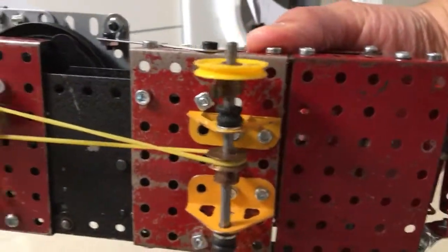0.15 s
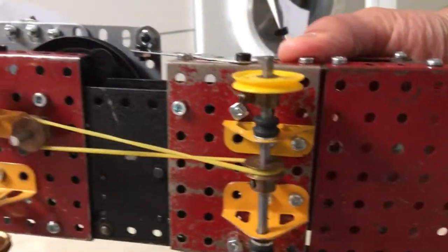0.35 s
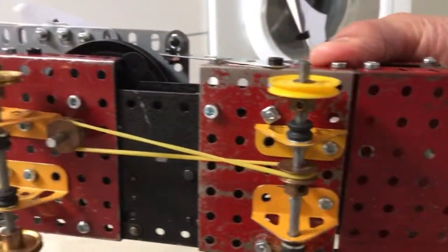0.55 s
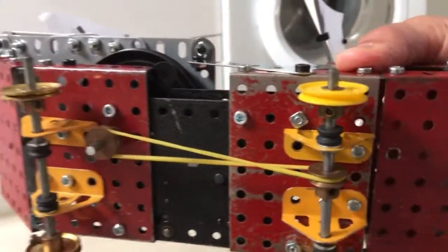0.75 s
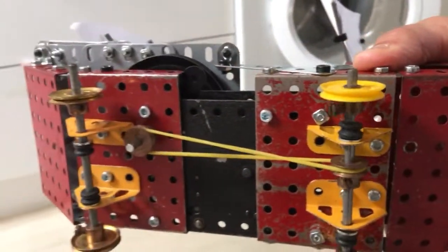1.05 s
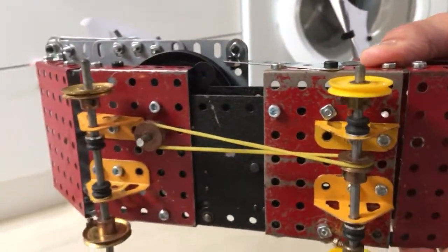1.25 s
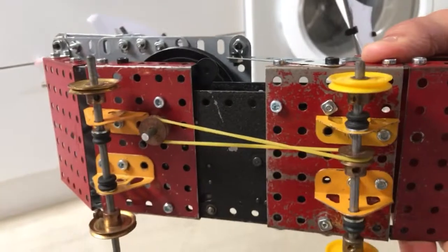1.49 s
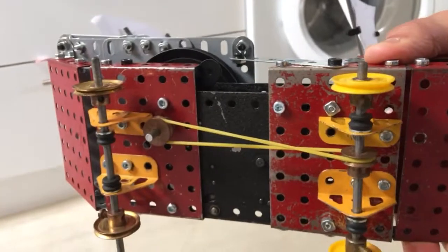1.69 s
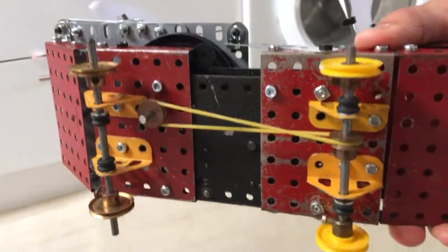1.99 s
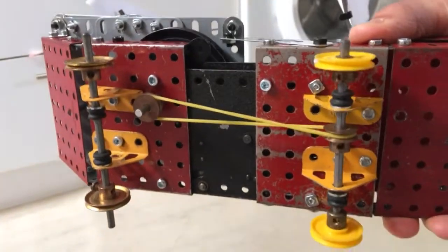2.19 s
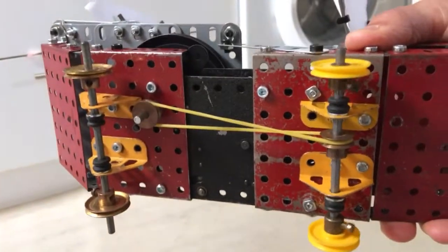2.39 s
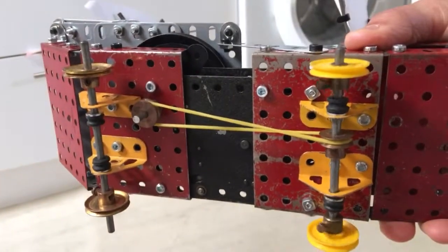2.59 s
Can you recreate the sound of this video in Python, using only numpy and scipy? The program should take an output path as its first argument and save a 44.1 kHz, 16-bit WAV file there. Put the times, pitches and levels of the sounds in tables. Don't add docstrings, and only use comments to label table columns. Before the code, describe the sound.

Clockwork gears whir in a dense metallic rattle, with thin squeals recurring at each slow pulley turn.

```python
import sys
import numpy as np
from scipy import signal
from scipy.fft import rfft, irfft
from scipy.io import wavfile
from scipy.ndimage import uniform_filter1d

SR = 44100
rng = np.random.default_rng(int(sys.argv[2]) if len(sys.argv) > 2 else 0)


def waveform_to_disk(signal):
    frames = np.transpose(np.atleast_2d(signal))
    scaled = np.clip(frames, -1, 1) * 32767
    samples = np.round(scaled).astype(np.int16)
    wavfile.write(sys.argv[1], SR, samples)


def gain_from_db(level_db):
    decades = np.asarray(level_db, float) / 20
    return 10 ** decades


N = 120834


def level(x, db):
    return x * gain_from_db(db) / np.sqrt(np.mean(x ** 2) + 1e-18)


def colour(x, points):
    hz, db = np.array(points, float).T
    size = 8192
    bins_hz = np.arange(size // 2 + 1) * SR / size
    gain_db = np.interp(np.log(bins_hz + 1), np.log(hz), db)
    cepstrum = irfft(np.log(gain_from_db(gain_db)))
    cepstrum[1:size // 2] *= 2
    cepstrum[size // 2 + 1:] = 0
    impulse = irfft(np.exp(rfft(cepstrum)))[:size // 2]
    return signal.fftconvolve(x, impulse)[:N]


def ring(x, hz, width_hz):
    b, a = signal.iirpeak(min(hz, .45 * SR), hz / width_hz, SR)
    return signal.lfilter(b, a, x)


def walk(rate_hz):
    hold = max(int(SR / rate_hz), 2)
    steps = np.repeat(rng.standard_normal(N // hold + 1), hold)
    return 1.3 * uniform_filter1d(uniform_filter1d(steps, hold), hold)[:N]


def patter(ticks_per_s, spread_db):
    chance, sign, size = rng.random((3, N))
    hit = chance < ticks_per_s / SR
    size_db = spread_db * np.minimum(-np.log(1 - size), 5)
    return level(hit * np.sign(sign - .5) * gain_from_db(size_db), 0)


# time_s, level_db
DRIVE = [(0, -34), (.35, -34), (.6, -33), (.85, -36.5), (1.0, -34), (1.2, -35.5), (1.45, -34),
         (1.75, -36.5), (2.0, -33.5), (2.3, -34.5), (2.55, -35), (2.74, -34.5)]
# freq_hz, gain_db (per Hz)
FRAME = [(300, -29.5), (1070, -16.5), (1800, -7), (3800, -3.5), (6000, -5.5), (8500, -4.5), (13000, -11),
         (15700, -18)]
# freq_hz, width_hz, level_db
PLATES = [(963, 21, -41.5), (1803, 32, -24), (1983, 30, -22), (2718, 81, -15), (3880, 360, -8),
          (4384, 45, -14.5), (5160, 190, -11), (5620, 270, -13.5), (6220, 84, -15), (6860, 83, -17)]
# freq_hz, width_hz, level_db
STIFF_PART = (12980, 70, -18)


def gears(t):
    throb = 1
    for shaft_hz, depth in [(83.5, .26), (117.5, .3)]:
        turns = np.cumsum(shaft_hz * (1 + .03 * walk(4))) / SR
        throb = throb * (1 + depth * np.cos(2 * np.pi * turns))

    def teeth():
        return patter(13000 * throb, 2.2)

    shake_db = .8 * walk(20)
    shared = teeth()
    out = level(colour(shared, FRAME), -2.34) * gain_from_db(.86 * walk(29.62))
    for hz, width_hz, db in [*PLATES, STIFF_PART]:
        plate = ring(shared + teeth(), hz, width_hz)
        out = out + level(plate, db) * gain_from_db(1.8 * walk(25))
    time_s, drive_db = np.array(DRIVE).T
    out = out * gain_from_db(np.interp(t, time_s, drive_db) + .91 + shake_db)
    return signal.sosfilt(signal.butter(2, 350, "high", fs=SR, output="sos"), out)


# start_s, length_s, pitch_hz, level_db
SQUEALS = [(.054, 0.01, 10700, -23), (.091, 0.0098, 10900, -29), (.132, 0.032, 10730, -25.5),
           (.165, 0.022, 11000, -44), (.188, 0.054, 10230, -35.5), (.206, 0.042, 11100, -29.5),
           (.228, .05, 9100, -33), (.255, 0.035, 10500, -28.5), (.3, 0.0084, 10440, -30),
           (.752, 0.02, 10800, -34), (.796, 0.015, 10600, -36), (.81, 0.031, 11100, -33),
           (.838, 0.035, 10750, -29.5), (.885, .012, 10700, -32), (.905, .03, 11100, -41),
           (.938, 0.015, 10700, -29), (.953, 0.037, 10440, -24.5), (1.016, 0.018, 10700, -27),
           (.95, .05, 12030, -49), (1.018, .025, 12030, -49),
           (1.517, 0.009, 10550, -31), (1.525, .035, 11150, -40), (1.56, .022, 10750, -29),
                (1.565, .012, 9500, -45), (1.585, 0.086, 11100, -37), (1.653, .025, 10700, -29),
                (1.676, 0.029, 10480, -24), (1.699, 0.015, 10550, -25), (1.727, 0.011, 10650, -29.5),
                (1.65, 0.076, 12030, -45), (1.733, .012, 12030, -42), (1.826, 0.0063, 11350, -29),
                (2.268, 0.021, 10800, -32.5), (2.31, .04, 11200, -48), (2.368, 0.036, 10550, -29.5),
                (2.406, 0.025, 10550, -30.5), (2.443, 0.009, 10640, -31), (2.37, .08, 12030, -43),
                (2.508, 0.013, 12030, -38), (2.535, .03, 11300, -42)]
# start_s, length_s, pitch_hz, level_db
CHIRPS = [(.163, 0.013, 5580, -30), (.182, 0.0084, 5450, -27), (.189, 0.021, 5190, -24.5),
          (.19, .014, 15480, -35), (.364, .024, 5600, -29), (.795, 0.037, 5450, -34),
          (.884, 0.011, 6030, -35), (.905, 0.017, 5650, -36), (1.62, 0.011, 5480, -34),
          (2.21, 0.054, 5480, -41), (2.264, .007, 5650, -29), (2.305, 0.033, 5720, -34.5),
          (2.336, 0.017, 5600, -29), (0.746, 0.05, 5650, -37), (1.495, 0.036, 5450, -45)]


def squeals(t):
    sag_hz, sag_s, edge_s = 150, .012, .002
    halo_db, halo_per_db, firm_db, chirp_halo_db = -15, .9, -27, 8
    halo_rate_hz = 1000
    wander_hz = 50 * (walk(120) + walk(500))
    flutter = gain_from_db(3.0 * walk(330))
    grit = walk(halo_rate_hz) + 1j * walk(halo_rate_hz)
    skirt = level(ring(patter(2500, 2.0), 9700, 3100), -11.5)
    out = np.zeros(N)
    for k, (start_s, length_s, hz, db) in enumerate([*SQUEALS, *CHIRPS]):
        i = slice(max(int((start_s - edge_s) * SR), 0), int((start_s + length_s + 4 * edge_s) * SR))
        shift = -997 * k
        age_s = t[i] - start_s
        ragged_db = halo_db + halo_per_db * (firm_db - db) + chirp_halo_db * (hz < 7000)
        rough = np.roll(flutter * (1 + gain_from_db(ragged_db) * grit), shift)[i]
        bend_hz = sag_hz * (np.exp(-age_s / sag_s) - .5) + np.roll(wander_hz, shift)[i]
        tone = np.exp(2j * np.pi * np.cumsum(hz + bend_hz * (hz / 10500) ** .5) / SR)
        catch = np.clip(age_s / edge_s + .5, 0, 1)
        release = np.clip((length_s - age_s) / (4 * edge_s) + .5, 0, 1) ** 2
        shape = catch * release
        fade_db = -1.5 * (age_s / length_s - .5)
        out[i] += gain_from_db(db - 2 + fade_db) * shape * (rough * tone).real
        out[i] += gain_from_db(db) * shape * skirt[i]
    return out


# start_s, length_s, level_db, low_share (0-1)
SCRAPES = [
    (.012, .022, -26.5, .55),
    (.366, .011, -28.5, .75),
    (.727, .022, -25.5, .2),
    (1.449, .016, -28, .35),
    (2.163, .013, -29.5, .45),
]


def scrapes(t):
    grit = patter(8500, 1.34)

    def burr(hz, width_hz):
        return level(ring(ring(grit, hz, width_hz), hz, 2 * width_hz), 0)

    low, high = burr(12030, 220), burr(12850, 800)
    half = level(ring(patter(6300, 2.61), 6145, 450), -4)
    edge_s, hold_s = .0015, 1
    out = 0
    for start_s, length_s, db, low_share in SCRAPES:
        edges_s = np.minimum(t - start_s, start_s + hold_s - t)
        gate = np.clip(edges_s / edge_s + .5, 0, 1) ** 2
        decay = np.exp(-(np.maximum(t - start_s, 0) / length_s) ** 2)
        mix = low_share ** .5 * low + (1 - low_share) ** .5 * high + half
        out = out + gain_from_db(db) * gate * decay * mix
    return out


# centre_s, length_s, level_db
RUBS = [
    (.24, 0.11, -42),
    (0.96, 0.15, -43.5),
    (1.63, 0.33, -47.5),
    (2.35, 0.26, -44.5),
    (2.68, 0.021, -42.5),
    (1.1, 0.037, -42.5),
    (.39, 0.033, -54),
]
# freq_hz, width_hz, level_db
BEARING = [(9100, 130, -5.5), (9520, 100, 0.5), (10300, 67, -8.5), (11100, 200, -2.5), (12030, 120, 0),
           (12800, 400, -4)]


def rubbing(t):
    press = sum(gain_from_db(db) * np.exp(-(2 * (t - centre_s) / length_s) ** 2) for centre_s, length_s, db in RUBS)

    def grit():
        return patter(5000, 3.0)

    out = level(ring(grit(), 9200, 5000), -5)
    for hz, width_hz, db in BEARING:
        out = out + level(ring(grit(), hz, width_hz), db) * gain_from_db(3.5 * walk(50))
    return press * out


# time_s, peak_db
TICKS = [
    (.3676, -33),
    (.807, -28),
    (0.886, -27.5),
    (0.8992, -28.5),
    (1.81, -34),
    (2.6124, -36),
    (2.6744, -24.5),
]


def ticks(t):
    hits = np.zeros(N)
    for time_s, db in TICKS:
        hits[int(time_s * SR)] = gain_from_db(db)
    tail = np.exp(-t[:600] / .0029) * rng.standard_normal(600)
    return gain_from_db(10.5) * colour(signal.fftconvolve(hits, tail)[:N], FRAME)


# time_s, freq_hz, peak_db, t60_s
KNOCKS = [
    (0.159, 527, -42.5, 0.18),
    (.88, 528.6, -52, 0.33),
    (0.938, 429, -44.5, 0.34),
    (2.07, 983, -38, 0.14),
    (2.078, 258, -63, .2),
    (2.325, 1745, -33, 0.1),
]


def knocks(t):
    out = 0
    for time_s, hz, db, t60_s in KNOCKS:
        age_s = np.maximum(t - time_s, 0)
        rise = 1 - np.exp(-age_s / .015)
        out = out + gain_from_db(db - 60 * age_s / t60_s) * rise * np.sin(2 * np.pi * hz * age_s)
    return out


# freq_hz, level_db (rms)
TONES = [(248, -71.5), (356, -71.5), (431, -72.5), (527, -66.5), (587, -68.5), (778, -66.5), (915, -66),
         (970, -68)]


def hum(t):
    out = gain_from_db(-59 + 3 + .49 * walk(9)) * np.sin(2 * np.pi * 49.4 * t)
    for hz, db in TONES:
        out = out + level(ring(rng.standard_normal(N), hz, 9), db)
    beat_top_s, beat_period_s = .54, .8
    beat = np.abs(np.cos(np.pi * (t - beat_top_s) / beat_period_s)) ** .75
    turns = np.cumsum(167.5 + 1.65 * walk(4.79)) / SR
    return out + gain_from_db(-64 + 3.5) * beat * np.sin(2 * np.pi * turns)


# centre_s, length_s, level_db
THUMPS = [
    (.165, .03, -58),
    (2.11, 0.064, -52.5),
]


def thumps(t):
    thud_colour = [(30, -27), (70, 8), (300, -3), (1000, -9), (2000, -29)]  # Hz, dB per Hz
    thud = level(colour(rng.standard_normal(N), thud_colour), 0)
    return thud * sum(gain_from_db(db) * np.exp(-((t - centre_s) / length_s) ** 2) for centre_s, length_s, db in THUMPS)


# freq_hz, gain_db (per Hz)
ROOM = [(28, -38), (45, -10), (80, -2), (120, -12.5), (300, -12.5), (800, -24), (1600, -42)]


def room():
    return level(colour(rng.standard_normal(N), ROOM), -63.5)


def scene():
    t = np.arange(N) / SR
    axle = squeals(t) + scrapes(t) + rubbing(t)
    contacts = ticks(t) + knocks(t)
    background = hum(t) + thumps(t) + room()
    return np.tile(gears(t) + axle + contacts + background, (2, 1))


def top_cut(x):
    return signal.sosfilt(signal.butter(12, 15720, fs=SR, output="sos"), x)


def record(dry):
    return top_cut(dry)


dry = scene()
out = record(dry)
waveform_to_disk(out)
```